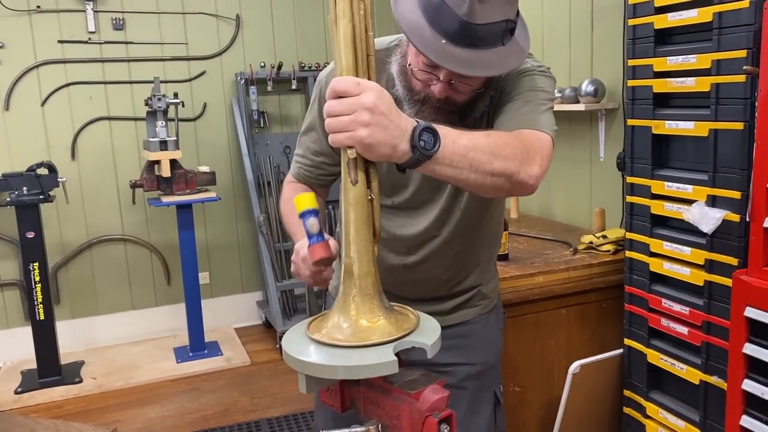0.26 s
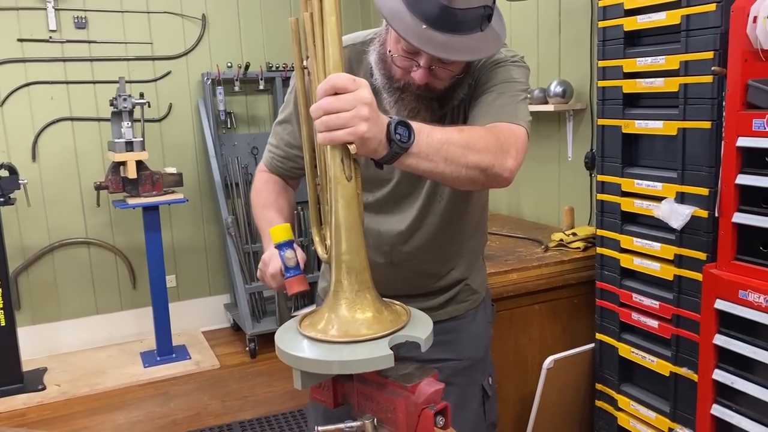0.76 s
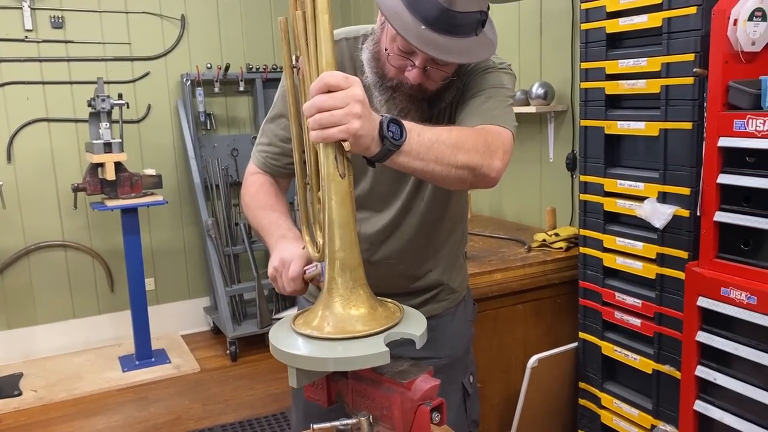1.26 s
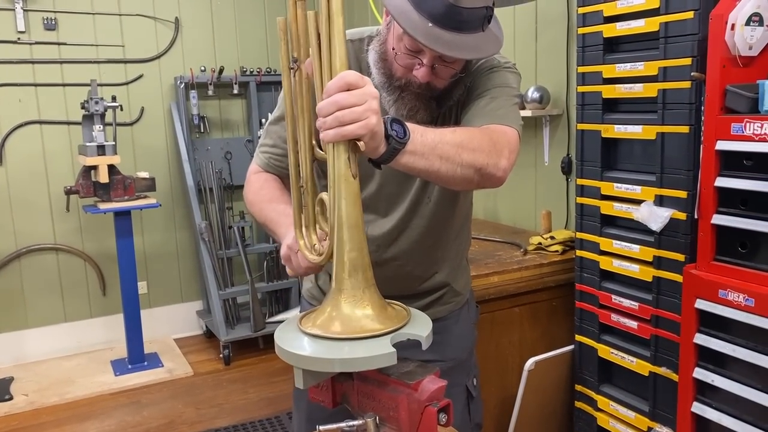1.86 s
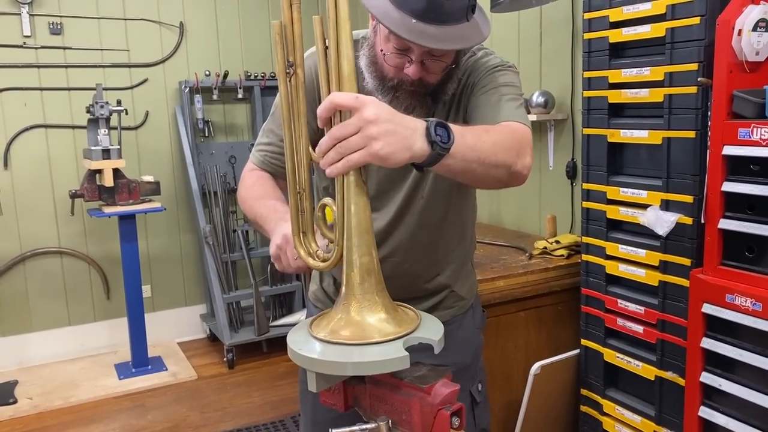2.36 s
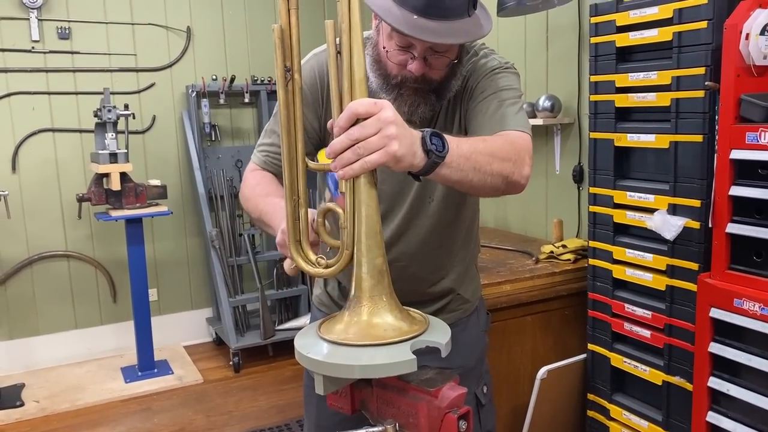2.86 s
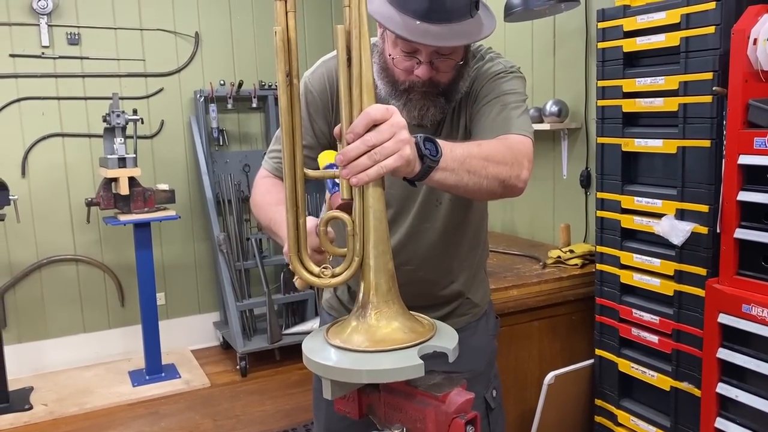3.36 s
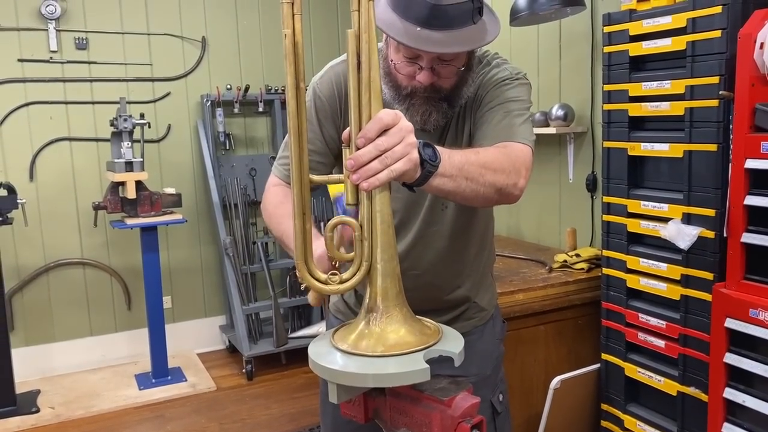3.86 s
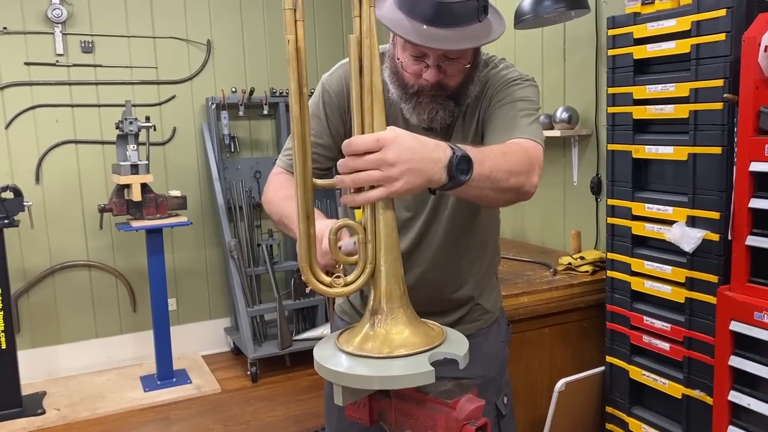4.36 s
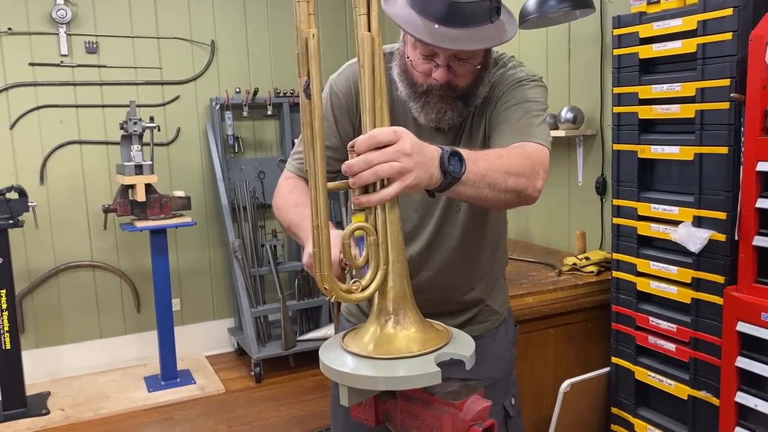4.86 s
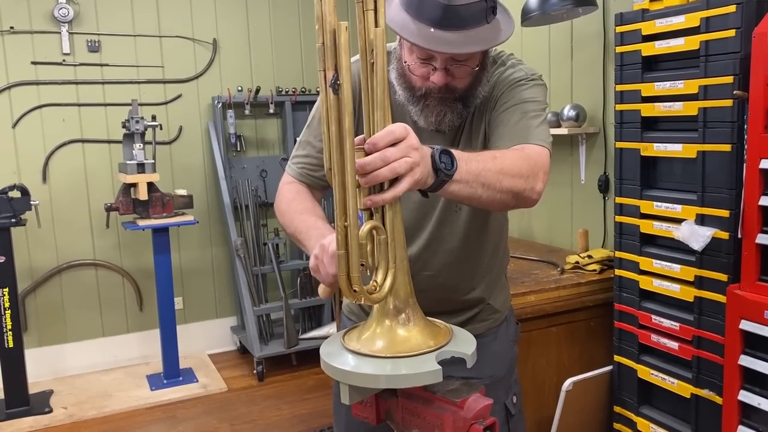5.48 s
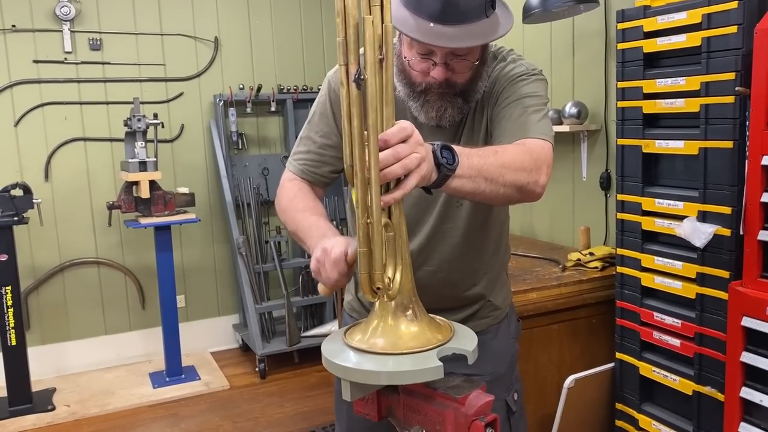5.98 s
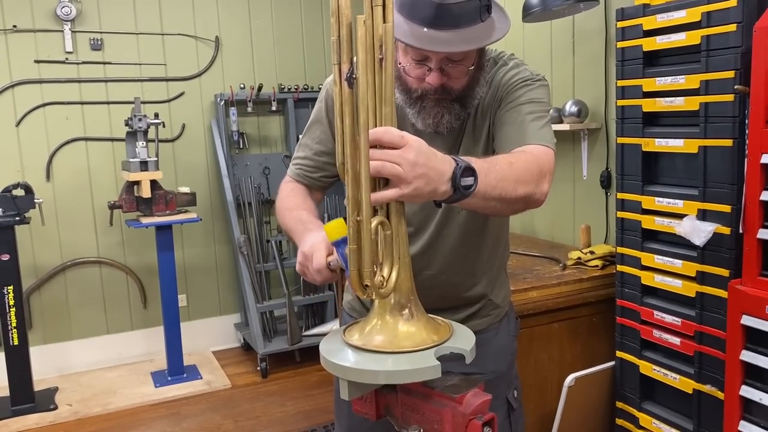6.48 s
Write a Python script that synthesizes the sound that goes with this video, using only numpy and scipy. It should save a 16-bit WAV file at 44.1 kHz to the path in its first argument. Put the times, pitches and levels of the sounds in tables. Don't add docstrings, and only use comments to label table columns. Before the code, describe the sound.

A rubber mallet beats a brass horn flare twelve times in a workshop, each hollow knock followed by a bright metallic rattle and short room echo.

```python
import sys
import numpy as np
from scipy import signal
from scipy.fft import rfft, irfft, next_fast_len
from scipy.io import wavfile
from scipy.ndimage import uniform_filter1d, minimum_filter1d, map_coordinates

SR = 44100
rng = np.random.default_rng(int(sys.argv[2]) if len(sys.argv) > 2 else 0)


def generate_wav(signal):
    frames = np.transpose(np.atleast_2d(signal))
    scaled = np.clip(frames, -1, 1) * 32767
    pcm = np.round(scaled).astype(np.int16)
    wavfile.write(sys.argv[1], SR, pcm)


def to_linear_factor(level_db):
    exponent = np.asarray(level_db, float) / 20
    return 10 ** exponent


N = 296793

# (time [s], knock level [dB], chatter level [dB], knock pitch [Hz], delay of rim slam [s])
BLOWS = [(0.3934, -9, -24, 772, .012), (1.123, -8.5, -20, 725, 0.0057), (1.591, -5, -16, 694, 0.0035),
         (2.0595, -5, -14, 667, 0.00075), (2.5538, -4, -14.5, 640, 0.0075),
         (3.0213, -10.5, -15.5, 654, 0.0026), (3.471, -6.5, -17.5, 695, 0.014),
         (3.9246, -6, -15, 660, 0.011), (4.588, -9, -15.5, 815, 0.018), (5.0878, -5.5, -14.5, 694, 0.0089),
         (5.564, -7, -20, 704, 0.019), (6.0349, -5, -18.5, 699, .0085)]
# (frequency [Hz], level [dB], time to fade by 60 dB [s])
LOW_NOTES = [(164.2, -15, 0.23), (253.3, -19, .15), (328.8, -8, 0.14), (366.3, -20.5, 0.099),
             (436.7, -10, 0.21), (634, -8, 0.042), (694, 0, 0.073), (768.4, -2.5, 0.11), (815, -6, 0.11),
             (930, -12, .06), (1125, -1.5, 0.078), (1504, -10.5, 0.022), (1830, -19, 0.05),
             (2050, -16.5, 0.0073)]
# (frequency [Hz], level [dB], time to fade by 60 dB [s])
BRASS_NOTES = [(2950, -25, .015), (3854, -20, .015), (4560, -22, .03), (5460, -18, .015), (6500, -10, .012),
               (6260, -12, .03), (7600, -9, .01), (7900, -7, .012), (8440, -9, .012), (8180, -7, .008),
               (8720, -4, .01), (9340, -3, .035), (9800, -9, .01), (10700, -11, .008)]
# (frequency [Hz], level [dB per Hz])
THUD = [(60, -32.5), (150, -9), (400, -6.5), (620, -10.5), (780, 2), (1150, -7.5), (1600, -9.5),
        (2500, -20.5), (6000, -67)]


def unit(x):
    return x / np.sqrt(np.mean(x ** 2) + 1e-20)


def along(points, hz):
    f, v = np.transpose(points)
    return np.interp(np.log(hz + 1), np.log(f + 1), v)


def noise(spectrum, size):
    hz = np.fft.rfftfreq(size, 1 / SR)
    white = rfft(rng.standard_normal(size))
    return unit(irfft(white * to_linear_factor(along(spectrum, hz)), size))


def wander(rate, size):
    values = rng.standard_normal(round(rate * size / SR) + 4)
    return map_coordinates(values, [np.arange(size) * rate / SR])


def swell(t, rise):
    return 1 - np.exp(-t / rise)


def ring(notes, scatter_db, size):
    hz, db, t60 = np.transpose(notes)[:3, :, None]
    t = np.arange(size) / SR
    level = db + scatter_db * rng.standard_normal(db.shape)
    return np.sum(to_linear_factor(level - 60 * t / t60) * np.sin(2 * np.pi * hz * t), axis=0)


def puff(spectrum, rise, t60, size):
    t = np.arange(size) / SR
    smooth = uniform_filter1d(rng.standard_normal(size), size=30)
    smooth = uniform_filter1d(smooth, size=20)
    grain = to_linear_factor(4.28 * unit(smooth))
    return noise(spectrum, size) * grain * swell(t, rise) * to_linear_factor(-60 * t / t60)


def add(track, s, x):
    part = track[round(s * SR):][:len(x)]
    part += x[:len(part)]


def air():
    # (frequency [Hz], level [dB per Hz])
    air_colour = [(10, -6.5), (20, -3), (60, -5.5), (100, -19.5), (250, -26.5), (1100, -38.5),
                  (2500, -52.5), (6500, -53.5), (10000, -55.5), (12000, -61.5), (16000, -73)]
    level_db = -49 + 1.8 * wander(6, N)
    return to_linear_factor(level_db) * noise(air_colour, next_fast_len(N))[:N]


def handling():
    # (time [s], level [dB], level of the sharp edge [dB])
    bumps = [(0.052, -34.5, -15.5), (0.107, -42, -26.5), (0.133, -41, -22.5), (0.193, -52, -10.5),
             (0.599, -28.5, -12), (0.826, -40, -35), (1.849, -26.5, -50), (2.353, -35.5, -30),
             (2.859, -36.5, -26), (4.287, -34.5, -29), (4.418, -31.5, -16.5), (6.447, -30.5, -36)]
    # (time of the middle [s], level [dB], length [s])
    scuffs = [(0.072, -65.5, 0.036), (0.134, -78.5, 0.034), (0.884, -67, 0.0084), (2.84, -73.5, 0.026),
              (2.964, -78, 0.038), (3.37, -78, .03), (4.314, -69.5, 0.027), (4.415, -65, 0.013),
              (4.498, -66, 0.017), (6.43, -67, 0.029), (6.586, -70.5, 0.077)]
    # (frequency [Hz], level [dB per Hz])
    palm_colour = [(120, -19.5), (250, -0.5), (450, -0.5), (1200, -3), (2000, -17), (3500, -37),
                   (7000, -80)]
    # (frequency [Hz], level [dB per Hz])
    scuff_colour = [(2000, -34.5), (4500, -4), (6500, -4), (9000, 3), (10500, -9.5), (12000, -42),
                    (16000, -64)]
    out, size = np.zeros(N), SR // 4
    t = np.arange(size) / SR
    for s, db, edge_db in bumps:
        knock = ring(LOW_NOTES[2:], scatter_db=2, size=size)
        knock = 0.3 * knock * to_linear_factor(-60 * t / 0.12) * swell(t, 0.002)
        palm = 0.88 * puff(palm_colour, rise=0.0026, t60=0.088, size=size)
        edge = to_linear_factor(edge_db) * puff(scuff_colour, rise=0.0006, t60=0.033, size=size)
        add(out, s, to_linear_factor(db - 6.5) * (knock + palm + edge))
    middle = 1 / 8
    for s, db, length in scuffs:
        stroke = np.exp(-((t - middle) / length) ** 4)
        scrape = to_linear_factor(db) * stroke * noise(scuff_colour, size)
        first = max(0, round((middle - s) * SR))
        add(out, max(s - middle, 0), scrape[first:])
    return out


def room(x):
    # (frequency [Hz], time to fade by 60 dB [s])
    tail_fade = [(80, 0.33), (250, 0.57), (700, 0.4), (2000, 0.44), (5000, 0.48), (9500, 0.37),
                 (11500, 0.27), (15000, 0.23)]
    # (frequency [Hz], level [dB])
    tail_colour = [(100, 4.5), (1000, -3), (3000, 2), (6000, -6.5), (10000, -4.5), (15000, -1)]
    out = np.zeros(N)
    thrown = x * (1 + 0.9 * wander(160, N))
    edges = [0] + [round((s - 0.01) * SR) for s, *_ in BLOWS] + [N]
    for a, b in zip(edges, edges[1:]):
        hz, t, z = signal.stft(rng.standard_normal(SR), SR, nperseg=256)
        fade = to_linear_factor(-60 * t / along(tail_fade, hz)[:, None])
        tail = signal.istft(z * fade, SR, nperseg=256)[1]
        colour = to_linear_factor(along(tail_colour, np.fft.rfftfreq(len(tail), 1 / SR)))
        tail = irfft(rfft(tail / np.linalg.norm(tail)) * colour, len(tail))[:SR * 3 // 4]
        source = unit(thrown[a:b]) * x[a:b].std()
        add(out, a / SR + 0.006, signal.fftconvolve(source, tail))
    return out


def blows():
    # (frequency [Hz], level [dB per Hz])
    slap_colour = [(710, 5), (1200, -4), (1930, 0.5), (2300, -7.5), (3100, -0.5), (3600, -8), (5250, 0),
                   (9530, 0), (11400, -50.5), (14600, -47), (16200, -36.5), (16700, -68)]
    # (frequency [Hz], level [dB per Hz])
    buzz_colour = [(1500, -31), (3500, 0.5), (6000, -4), (8500, -9), (10500, -1), (12000, -20.5),
                   (15000, -25), (16500, -52)]
    out, size = np.zeros(N), SR // 2
    t = np.arange(size) / SR
    for s, knock_db, chatter_db, hz, _ in BLOWS:
        spot = [(hz, 2, 0.045)]
        flare = ring(LOW_NOTES[5:] + spot, scatter_db=1.5, size=size) * swell(t, 0.00088)
        plate = ring(LOW_NOTES[:5], scatter_db=2, size=size) * swell(t, 0.0073)
        thud = puff(THUD, rise=0.0017, t60=0.076, size=size)
        add(out, s, to_linear_factor(knock_db - 6.0) * (flare + plate) + to_linear_factor(knock_db - 3.5) * thud)
        slap = 0.93 * puff(slap_colour, rise=0.00055, t60=0.06, size=size)
        buzz = 0.17 * puff(buzz_colour, rise=0.0078, t60=0.17, size=size)
        chatter = slap + buzz + 0.63 * ring(BRASS_NOTES, scatter_db=8.0, size=size)
        add(out, s + 0.0007, to_linear_factor(chatter_db + 5.0) * chatter)
    return out


def singing():
    # (frequency [Hz], time to fade by 60 dB [s])
    tubes = [(9340, .24), (6285, .9), (4560, .36)]
    # (time [s], level [dB])
    high_contacts = [(.40, -40), (1.667, -22.5), (1.70, -27.5), (2.075, -30), (2.58, -47.5), (3.13, -30.5),
                     (3.95, -45.5), (4.605, -37.5), (5.10, -29.5), (5.172, -22.5), (5.64, -38),
                     (6.136, -39)]
    # (time [s], level [dB])
    middle_contacts = [(1.18, -45), (2.62, -53), (3.13, -54), (3.544, -57), (3.95, -52), (4.69, -53)]
    # (time [s], level [dB])
    low_contacts = [(1.72, -42), (3.596, -41), (5.641, -40), (6.099, -40), (6.17, -40)]
    out, size = np.zeros(N), SR // 2
    t = np.arange(size) / SR
    for (hz, t60), contacts in zip(tubes, [high_contacts, middle_contacts, low_contacts]):
        blur = 1.4 * np.exp(-(t60 / 0.7) ** 4)
        for s, db in contacts:
            level, phase = wander(190, size), wander(190, size)
            line = np.sin(2 * np.pi * hz * t + blur * phase)
            loudness = to_linear_factor(db - 3 + 3 * blur * level - 60 * t / t60)
            add(out, s, loudness * line * swell(t, 0.003) * (1 - (t / t[-1]) ** 4))
    return out


def bench():
    # (frequency [Hz], level [dB], time to fade by 60 dB [s], direction and size of first swing [about +-1])
    board_notes = [(16.9, -2.5, 1.42, -1.01), (29.96, -19, 2.4, -1.7), (35.73, -17, 1.2, -0.54),
                   (49.34, -1, 0.53, 1), (65.9, -7, 0.81, -1), (84, -27, 0.13, 1), (103.2, -2.5, 0.56, 1)]
    out, t = np.zeros(N), np.arange(SR) / SR
    fade_out = (1 - (t / t[-1]) ** 2) ** 2
    for s, _, chatter_db, *_ in BLOWS:
        db = -18.5 + 0.55 * (chatter_db + 13.5)
        sway = sum(swing * ring([note], scatter_db=1.2, size=SR) for *note, swing in board_notes)
        add(out, s + 0.011, to_linear_factor(db) * sway * swell(t, 0.03) * fade_out)
    return out


def bounces():
    # (time [s], rattle level [dB], contact frequency [Hz], share that rings the brass [0-1])
    landings = [(.453, -33.5, 8560, 0.46), (.481, -29, 5800, .1), (.499, -34.5, 9300, .1),
                (.509, -27, 9300, 0), (0.531, -35, 8400, 0), (.586, -41, 8000, 0.25),
                (1.174, -23.5, 8700, 0.2), (1.1821, -16.5, 8660, 0.21), (1.2279, -26, 7400, 0.15),
                (1.665, -25, 10700, 0.35), (1.701, -17.5, 9400, 0.42), (1.7145, -17.5, 6300, .2),
                (1.729, -25, 8440, .4), (2.126, -16.5, 8300, 0.69), (2.1537, -15, 8300, 0),
                (2.6253, -17.5, 8900, 0.24), (3.080, -12, 8800, 0.63), (3.13, -16, 9400, 0.42),
                (3.5329, -16.5, 9100, 0.1), (3.546, -12, 9400, 0.33), (3.586, -24.5, 9000, .2),
                (3.982, -17, 8000, 0.24), (4.6605, -17.5, 8200, 0.16), (4.6911, -18, 8430, 0.32),
                (5.171, -12, 9300, 0.3), (5.626, -16, 6400, 0.19), (6.103, -22, 8260, 0.35),
                (6.124, -19, 8120, .3), (6.134, -20.5, 9400, 0.38), (6.165, -29.5, 8100, 0.35)]
    # (frequency [Hz], level [dB per Hz])
    rattle_colour = [(1500, -35), (3500, -19), (6000, -6), (8500, -7.5), (10500, -2), (12000, -17.5),
                     (15000, -25.5), (16500, -50)]
    out, size = np.zeros(N), SR // 8
    length = 0.0062
    # (time [s], rattle [dB], thud [dB], contact [Hz], ringing share)
    slams = [(s + late, db + 9, -29, 8300, 0.28) for s, _, db, _, late in BLOWS]
    later = [(s, db, db - 7.5, hz, share) for s, db, hz, share in landings]
    for s, db, thud_db, hz, share in slams + later:
        rattle = puff(rattle_colour, rise=length / 2.9, t60=3.18 * length, size=size)
        spot = [(hz, 0, 0.006)]
        near = [(f, level - 40 * abs(np.log(f / hz)), t60) for f, level, t60 in BRASS_NOTES + spot]
        struck = signal.fftconvolve(rattle, ring(near, scatter_db=4, size=size))[:size]
        brass = (1 - share) * 0.99 * rattle + share * 3 * struck / np.abs(struck).max()
        thud = puff(THUD, rise=0.00071, t60=0.056, size=size)
        add(out, s, to_linear_factor(db + 2.5) * brass + to_linear_factor(thud_db + 2.0) * thud)
    return out


def scene():
    knocks, landing = blows() + handling(), bounces()
    shop = room(knocks + to_linear_factor(-1.5) * landing)
    return (knocks + landing + singing() + to_linear_factor(-1.5) * shop + bench() + air())[None]


def low_pass(x):
    return signal.sosfilt(signal.butter(12, 16860, fs=SR, output="sos"), x)


def record(dry):
    need = np.minimum(1, to_linear_factor(3.0) / (np.abs(dry) + 1e-9))
    gain = minimum_filter1d(need, size=300, axis=1)
    gain = uniform_filter1d(gain, size=200, axis=1)
    x = dry * gain
    x = x / (1 + np.abs(x / 0.4) ** 6) ** (1 / 6)
    x = signal.sosfilt(signal.cheby2(10, 40, 16350, fs=SR, output="sos"), x)
    return low_pass(x)


dry = scene()
out = record(dry)
generate_wav(out)
```